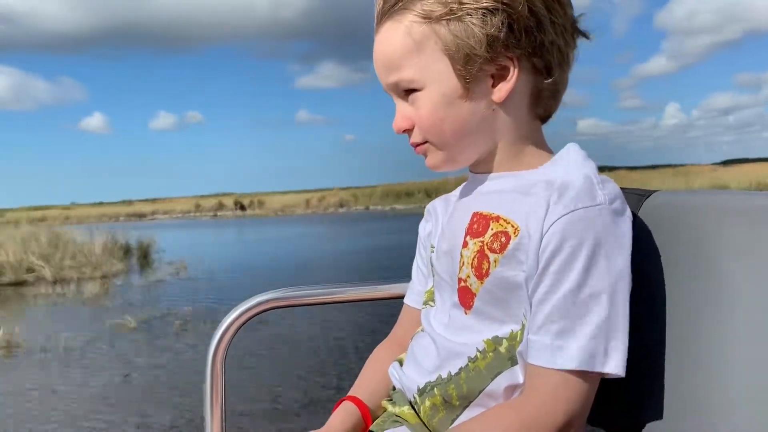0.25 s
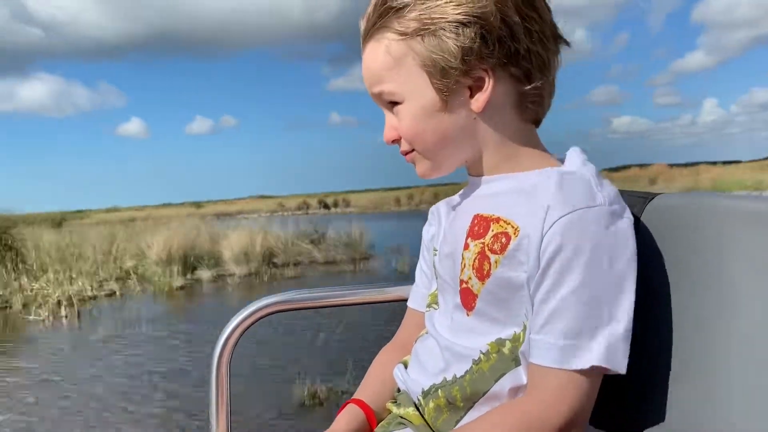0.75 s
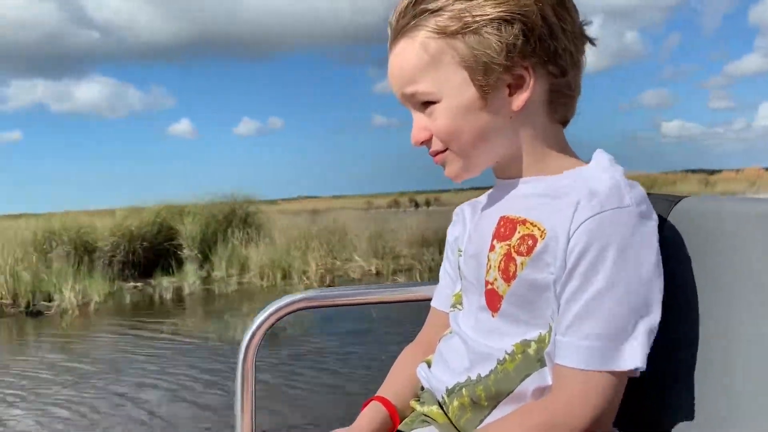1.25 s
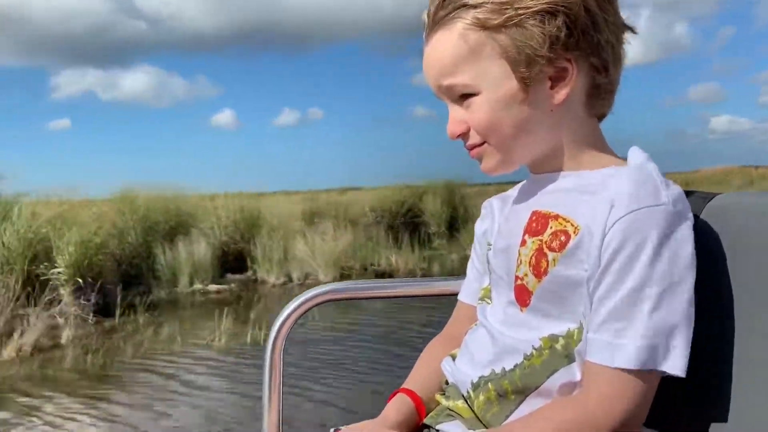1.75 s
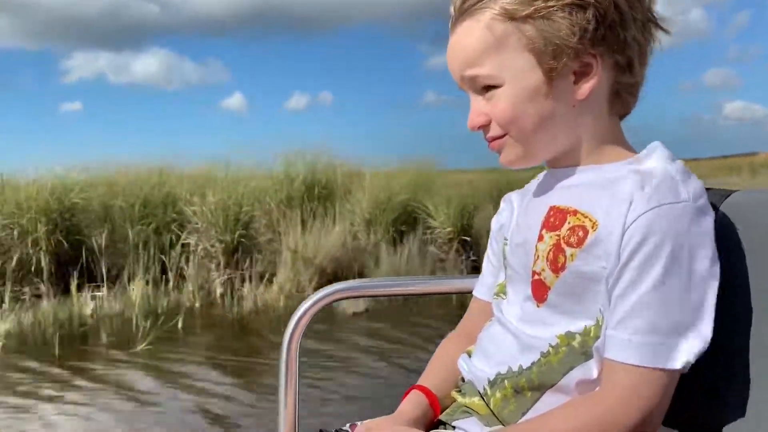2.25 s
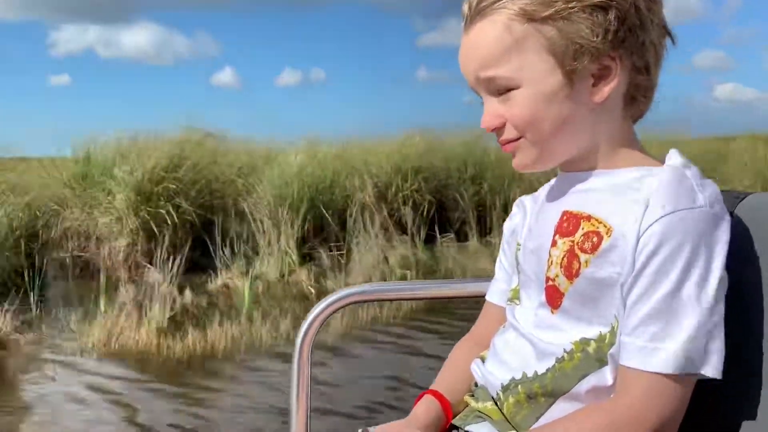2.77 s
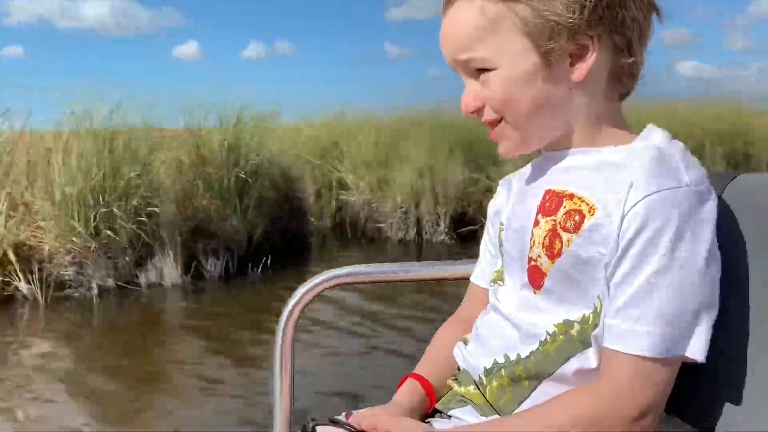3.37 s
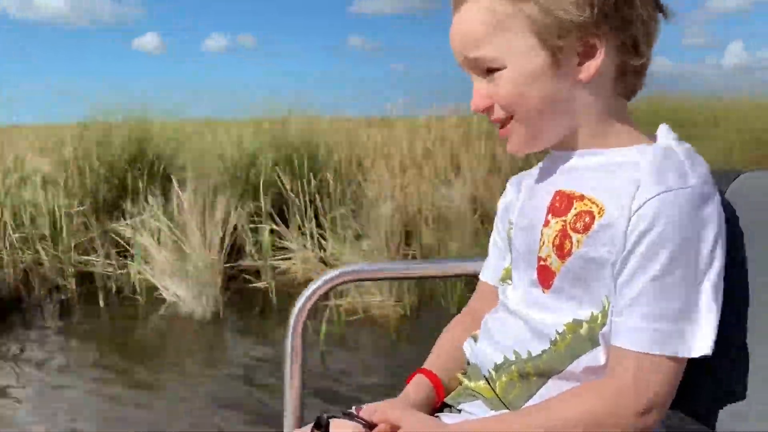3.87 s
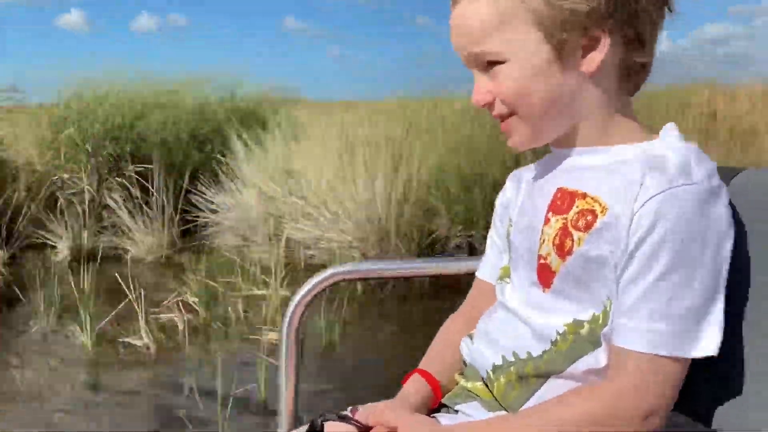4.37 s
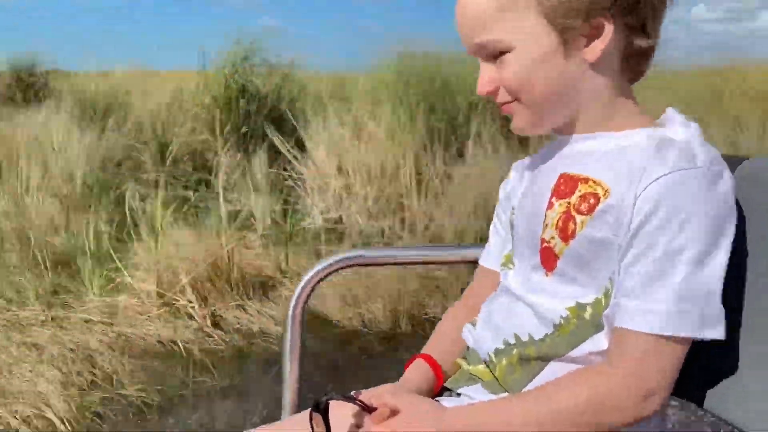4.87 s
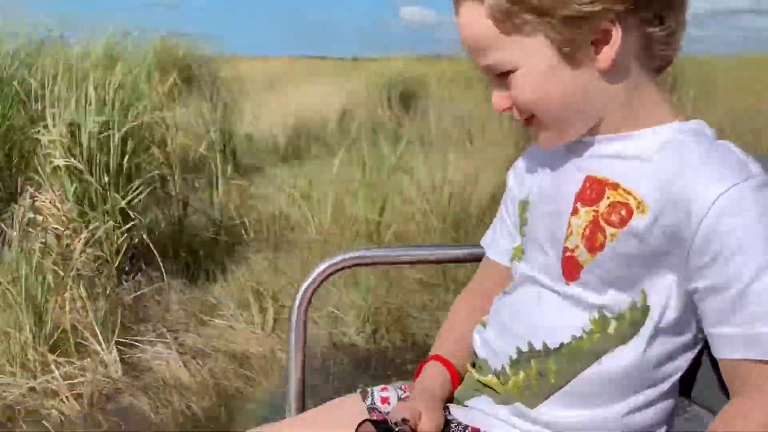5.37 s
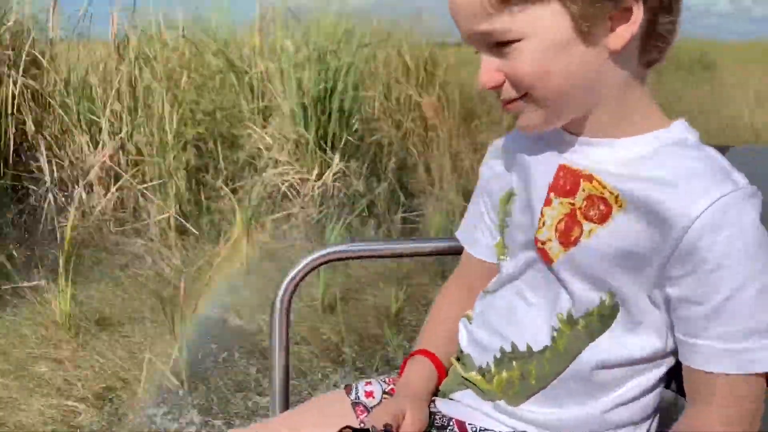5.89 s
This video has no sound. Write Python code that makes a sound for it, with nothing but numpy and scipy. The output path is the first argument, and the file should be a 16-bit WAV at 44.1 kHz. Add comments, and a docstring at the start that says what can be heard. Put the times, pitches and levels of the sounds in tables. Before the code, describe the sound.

Constant low propeller drone with fluttering buzz and exhaust throb fills an open marsh, air roar and hiss swelling slightly as the boat enters grass.

```python
"""Open marsh, on board a cruising airboat: the microphone is at a seat in front of the engine cage.
Closest is the three-blade propeller, whose clean drone and fluttering buzz are sums of blade-rate partials.
They beat against the exhaust partials of the geared V8 that turns it; a thin gear whine lies above.
Shaped noise makes the air rushing through the blades, the spray and the wind; its hiss swells in the grass.
Twice the microphone shifts in the hull's reflections, which recolours the buzz and exhaust."""
import sys
import numpy as np
from scipy import signal
from scipy.fft import rfft, irfft, next_fast_len
from scipy.io import wavfile

SR = 44100
rng = np.random.default_rng(int(sys.argv[2]) if len(sys.argv) > 2 else 0)


def to_wav(s):
    """Save 16-bit WAV."""
    ch = np.atleast_2d(s).T  # columns
    pcm = np.round(np.clip(ch, -1, 1) * 32767)  # PCM
    wavfile.write(sys.argv[1], SR, pcm.astype(np.int16))


N = 270333  # length [samples]

# Steady blade load at the two ports:
# (multiple of the blade rate, left lead [rad], left level [dB], right level [dB])
DRONE_PARTIALS = [(1, -.26, -21.6, -20.2), (2, -.09, -21.9, -22.3)]


def drone(blade):
    """The steady load on the blades: a rounded sawtooth of two clean partials, fluttering slightly."""
    out = np.zeros((2, N))
    for multiple, lead, *ears_db in DRONE_PARTIALS:
        arriving = multiple * blade + np.array([[lead], [0]]) / (2 * np.pi)
        flutter = from_db(0.5 * drift(13.0))
        out -= from_db(ears_db)[:, None] * tone(arriving) * flutter
    return out


# Propeller buzz at the microphone's three places, before BUZZ_DB:
# (multiple of the blade rate, left lead [rad], then left level [dB], right level [dB] for each place)
BUZZ_PARTIALS = [(3, -0.2, -44.5, -41.3, -44, -45.5, -44, -46),
                 (4, -1.5, -46.5, -42.2, -46, -42.5, -47.5, -43.5),
                 (5, 2.1, -43.7, -42.2, -40, -45.5, -42.5, -45),
                 (6, -2.3, -42, -46.5, -48, -51.5, -42, -50),
                 (7, 2.1, -53.5, -54, -49.5, -52, -44.5, -47.5),
                 (8, -1.4, -47, -45.7, -48.5, -48.5, -45.5, -50),
                 (9, -1.1, -47.5, -48.5, -52.5, -49.5, -47.5, -50),
                 (10, -1.8, -53.5, -51, -51, -48.5, -49, -50.5),
                 (11, -0.7, -49.5, -52, -54.5, -51, -52, -53.5),
                 (12, -2.2, -54.5, -52.5, -60.5, -53, -57.5, -53),
                 (13, -2.1, -52, -50.5, -54, -53, -59, -57.5), (14, 2.5, -52, -55, -55, -60, -54.5, -58),
                 (15, 3.0, -55.5, -56.5, -57.5, -59, -54.5, -54.5),
                 (16, 2.5, -63, -59.5, -57, -58, -55, -54.5), (17, 2.1, -56, -57, -57.5, -57.5, -56, -57.5),
                 (18, 2.5, -62, -62, -64, -64, -59, -59), (19, -3.1, -63, -60.5, -61.5, -59.5, -63, -62.5),
                 (20, -2.4, -61.5, -60.5, -60.5, -61, -62, -61.5),
                 (22, 3.1, -62, -62.5, -60.5, -62, -69.5, -69), (23, 3.0, -66, -66, -66, -66, -62, -62)]
BUZZ_DB = -0.73


def blade_buzz(blade, place, surging_db):
    """Blades chop eddies: upper partials flutter, the more the higher they lie; single ones flare at listed times."""
    steady_share, loss_per_order = .92, .055
    swell_db, swell_hz = 0.6, 8
    width_hz, widen_hz = 4.7, 0.4  # flutter rate: base, and what each order adds
    # moving air bends the travel time of all partials at once
    bent = blade + .009 * drift(8)
    out = np.zeros((2, N))
    for row in BUZZ_PARTIALS:
        multiple = row[0]
        gain = from_db(BUZZ_DB + surging_db + swell_db * drift(swell_hz))
        steady = steady_share - loss_per_order * multiple
        flutter_hz = width_hz + widen_hz * multiple
        out += partial(row, bent + rng.random(), place, steady, flutter_hz, gain, flares(multiple))
    return out


# Eddies that the blades chop, each making one partial flare; the shortest are single slaps:
# (time [s], multiple of the blade rate, level before FLARE_DB [dB], peak to a third [s])
EDDY_FLARES = [(0.313, 11, -41, .007), (0.366, 11, -43, .012), (0.47, 3, -37, .025), (0.604, 11, -41, .011),
               (0.659, 19, -46, .008), (0.755, 15, -43, .007), (0.83, 3, -30.5, .028),
               (0.981, 11, -38, .007), (1.395, 8, -41, .015), (1.41, 3, -32, .025), (1.432, 19, -45, .009),
               (1.59, 3, -35, .025), (1.652, 19, -45, .008), (2.165, 11, -39.5, .016), (2.36, 3, -34, .025),
               (2.823, 12, -42, .008), (2.89, 14, -48, .02), (3.00, 8, -44, .025), (3.08, 5, -41, .025),
               (3.313, 17, -44, .007), (3.55, 5, -36, .025), (3.632, 10, -40, .007), (3.75, 10, -45, .02),
               (3.95, 5, -41, .025), (4.27, 5, -41, .025), (4.52, 4, -39, .025), (4.82, 6, -43, .025),
               (5.01, 6, -41, .025), (5.06, 9, -42, .02), (5.251, 15, -44, .018), (5.538, 10, -41, .012),
               (5.613, 11, -36.5, .008), (5.648, 16, -42, .013), (5.692, 12, -42, .007),
               (5.745, 8, -43, .015), (5.799, 8, -41, .024), (5.80, 4, -38, .025), (5.84, 11, -39, .02),
               (5.96, 7, -35.5, .011), (5.972, 9, -39, .012), (5.97, 3, -34, .025), (6.049, 10, -39, .01),
               (6.076, 11, -39, .022), (6.11, 3, -33, .025)]
FLARE_DB = 0.5  # added to every flare


def flares(multiple):
    """Strength of one partial's flares: each swells and dies as its eddy crosses the disc."""
    return sum(from_db(db + FLARE_DB) * bump(s, width_s)
               for s, order, db, width_s in EDDY_FLARES if order == multiple)


# Exhaust at the microphone's three places:
# (multiple of the four-stroke cycle rate, left lead [rad], then left level [dB], right level [dB] for each place)
EXHAUST_PARTIALS = [(2, -0.3, -39.0, -38.5, -38.5, -38.0, -38.0, -38.0),
                    (3, -0.4, -36.5, -36.0, -36.0, -35.5, -44.0, -44.5),
                    (4, -0.1, -58.0, -58.0, -52.0, -56.5, -51.0, -54.0),
                    (5, -0.3, -34.5, -35.5, -35.0, -35.5, -37.5, -38.0),
                    (6, -0.3, -55.5, -55.5, -47.0, -48.5, -50.0, -55.5),
                    (7, -0.2, -50.5, -56.5, -42.5, -46.0, -43.0, -47.0),
                    (8, -0.7, -44.5, -48.5, -46.5, -59.5, -51.5, -53.0),
                    (9, -1.8, -50.5, -50.0, -55.5, -50.5, -56.5, -48.5),
                    (10, -2.9, -46.5, -43.0, -46.0, -44.0, -44.5, -56.5),
                    (11, -1.1, -47.0, -51.0, -52.0, -56.0, -48.5, -53.0),
                    (15, -0.2, -58.5, -54.5, -55.5, -59.0, -54.0, -57.0),
                    (16, 0.1, -52.0, -53.5, -54.0, -59.0, -53.0, -59.5),
                    (19, -0.7, -61.0, -58.5, -60.5, -56.5, -57.5, -55.0),
                    (28, -0.6, -61.0, -62.0, -63.5, -63.5, -63.0, -60.5),
                    (30, -1.7, -65.0, -63.0, -59.5, -59.0, -63.0, -62.0)]


def exhaust(cycle, place):
    """Eight firings a cycle, unevenly split between two pipes, sound many cycle multiples; the upper ones throb."""
    ragged_order, width_hz = 16, 6  # uneven combustion leaves no steady tone from this multiple up
    return sum(partial(row, cycle, place, 1 - (row[0] / ragged_order) ** 2, width_hz)
               for row in EXHAUST_PARTIALS)


# Gear whine: (time [s], level before WHINE_DB [dB])
WHINE_LEVEL = [(0.25, -69), (0.8, -64), (1.3, -68), (2.2, -63), (2.7, -58), (3.0, -61), (3.25, -56),
               (3.8, -59), (4.05, -69), (4.35, -59), (5.0, -57.5), (5.95, -59), (6.12, -53)]
WHINE_DB = -3


def gear_whine(cycle):
    """Teeth of the reduction drive mesh in a thin whine, broken up by the moving air on its way to each port."""
    meshes_per_cycle = 96
    flutter_db, flutter_hz = 2.6, 11
    bend_turns, bend_hz = .11, 8
    whine_db, = in_time(WHINE_LEVEL)
    ears = []
    for _ in range(2):
        turns = meshes_per_cycle * cycle + rng.random() + bend_turns * drift(bend_hz)
        ears.append(tone(turns) * from_db(flutter_db * drift(flutter_hz)))
    return from_db(WHINE_DB + whine_db) * np.array(ears)


# Broad eddies that make the throaty roar surge: (time [s], rise [dB])
ROAR_SURGES = [(0.33, 3), (0.64, 2.5), (1.25, 2), (1.47, 3), (1.93, 1), (2.16, 2), (2.33, 2), (2.86, 7),
               (3.0, 2), (3.17, 2.5), (3.68, 4), (5.05, 3), (5.25, 4), (5.83, 1), (6.06, 0.5)]
# Upper roar, 1.2-2.3 kHz: (time [s], level before UPPER_DB and surges [dB])
UPPER_ROAR_LEVEL = [(0.0, 1), (0.3, -0.5), (0.9, 0.8), (1.4, 3.2), (1.8, 1.0), (2.22, 3.2), (2.55, -0.8),
                    (3.05, 0.8), (3.3, 2), (3.58, 0.5), (4.1, -0.6), (4.65, 1.5), (5.4, 0.8), (5.7, 1.5),
                    (6.1, 2.5)]
SURGE_S = 0.05  # from a surge's peak to a third of its height
UPPER_DB, UPPER_SURGE_SHARE = -0.9, 0.46  # the share of each surge that reaches the upper roar


def prop_wash(blade, roar_db, surging_db):
    """The roar of the air stream swells unevenly with every blade, its low and high parts at different moments."""
    low_turn, high_turn = 0.2, 0.46  # where in a blade pass each part peaks [turns]
    low_depth, high_depth, uneven_db = .13, .33, 3
    eddy_db, eddy_hz = 1.0, 16
    edges_hz = [230, 400, 620, 1200, 1650, 2300]
    upper_db, = in_time(UPPER_ROAR_LEVEL)
    # eddies of each size come and go on their own
    eddies = [rush(low_hz, high_hz) * from_db(eddy_db * drift(eddy_hz))
              for low_hz, high_hz in zip(edges_hz, edges_hz[1:])]
    # a rasping resonance follows the surging air twice and flares twice as strongly
    rasp = rush(950, 1090) * from_db(surging_db + 2 * eddy_db * drift(eddy_hz))
    swell_db = sum(db * bump(s, SURGE_S) for s, db in ROAR_SURGES)
    low = (eddies[0] + eddies[1]) * from_db(roar_db)
    throat = (eddies[2] + rasp) * from_db(surging_db + swell_db)
    upper = (eddies[3] + eddies[4]) * from_db(UPPER_DB + upper_db + UPPER_SURGE_SHARE * swell_db)
    out = low * strokes(blade, low_turn, low_depth, uneven_db)
    for part in (throat, upper):
        out += part * strokes(blade, high_turn, high_depth, uneven_db)
    return out


# Hiss of water and grass along the hull: (time [s], level [dB])
GRASS_HISS = [(0.3, -0.9), (1.7, -0.5), (5.0, -0.6), (5.7, 0.5), (5.85, 1.5)]


def spray(blade, spray_db):
    """Patchy rasp of the air stream under the bright hiss of water and grass along the hull."""
    grass_db, = in_time(GRASS_HISS)
    pulse = 1 + .04 * np.cos(2 * np.pi * (blade - .5))
    patter = from_db(.45 * drift(60))
    rasp = rush(2300, 2900) * from_db(1.5 * drift(11)) + rush(2900, 5000)
    hiss = rush(5000, 17000) * from_db(grass_db)
    return (rasp * from_db(spray_db) + hiss) * pulse * patter


def wind(gust_db):
    """Gusts rumble on the microphone's ports, under the dull turbulence round the boat."""
    return rush(20, 72) * from_db(gust_db) + rush(52, 240) * from_db(-1.0 * drift(8.3))


# Rushing air and spray, before each layer's own gain: (frequency [Hz], density [dB per Hz])
RUSH_SPECTRUM = [(20, -69.5), (35, -61.8), (60, -58), (130, -59.6), (220, -58.9), (330, -67), (420, -71.6),
                 (520, -71), (690, -74.2), (780, -72), (880, -75), (1000, -70.8), (1160, -76.5),
                 (1400, -76.2), (1700, -78), (1900, -77.2), (2150, -78.6), (2400, -81), (2700, -81.8),
                 (5000, -89.6), (6300, -89.2), (14000, -93.4)]
# How alike the rush is in both ears: (frequency [Hz], likeness [0-1])
EAR_LIKENESS = [(60, .88), (210, .85), (300, .25), (700, .15), (1800, .4), (4000, .18), (7000, .5),
                (9000, .76), (14000, .84)]
# How much louder the rush is on the left: (frequency [Hz], difference [dB])
LEFT_EXCESS = [(100, 0), (1000, 0), (2200, 1.6), (4000, 1.2), (8000, -.7), (13000, 0)]
LEFT_LAG_S = 0.0002202  # the boat's noise reaches the right port first


def rush(low_hz, high_hz):
    """One band of rushing air in stereo: a shared part that reaches the left late, and a diffuse part."""
    size = next_fast_len(N)
    hz = np.arange(size // 2 + 1) * SR / size
    shared, *diffuse = rfft(rng.standard_normal((3, size)))
    direct = np.array([shared * np.exp(-2j * np.pi * hz * LEFT_LAG_S), shared])
    alike = np.clip(at_hz(EAR_LIKENESS, hz), 0, 1)
    field = np.sqrt(alike) * direct + np.sqrt(1 - alike) * np.array(diffuse)
    # half the difference is added on the left and taken from the right
    field = field * from_db(at_hz(LEFT_EXCESS, hz) / 2 * [[1], [-1]])
    below_high = 1 / (1 + (hz / high_hz) ** 8)
    below_low = 1 / (1 + (hz / low_hz) ** 8)
    band = np.sqrt(np.abs(below_high - below_low))
    spectrum = field * band * from_db(at_hz(RUSH_SPECTRUM, hz))
    return irfft(spectrum, size)[:, :N] * np.sqrt(SR / 2)


def partial(row, turns, place, steady, width_hz, gain=1, flare=0):
    """One order at both ports, steady tone plus flutter; direct sound and reflections add anew at each place."""
    multiple, lead, *levels_db = row
    steady = np.clip(steady, 0, 1)
    shared = .3  # share of the flutter that is common to both ports
    common = np.sqrt(shared) * np.array([drift(width_hz), drift(width_hz)])
    # a flare slides in pitch as its eddy moves: .11 rad per order
    slide = .11 * multiple * drift(22)
    ears = []
    for ear_lead, places_db in zip((lead, 0), np.reshape(levels_db, (-1, 2)).T):
        level = gain * np.interp(place, range(len(places_db)), from_db(places_db))
        angle = (2 * np.pi * (multiple * turns % 1) + ear_lead).astype(np.float32)
        own = np.sqrt(1 - shared) * np.array([drift(width_hz), drift(width_hz)])
        along, across = np.sqrt(1 - steady) * (common + own)
        held = level * ((np.sqrt(2 * steady) + along) * np.sin(angle) + across * np.cos(angle))
        ears.append(held + np.sqrt(2) * flare * np.sin(angle + slide))
    return np.array(ears)


def strokes(blade, peak_turn, depth, uneven_db):
    """A swell for every blade pass, each with a strength of its own; rms 1."""
    turns = blade - peak_turn + 1.5
    strengths = from_db(uneven_db * np.clip(rng.standard_normal(N // 100), -2, 2))
    strength = strengths[turns.astype(int)]
    swell = 1 - depth + 2 * depth * strength * np.sin(np.pi * turns) ** 2
    return swell / np.sqrt(np.mean(swell ** 2))


def bump(s, width_s):
    """A smooth swell of height 1 around a moment."""
    return np.exp(-np.minimum(((np.arange(N) / SR - s) / width_s) ** 2, 20))


def tone(turns):
    """A clean sine of rms 1."""
    return np.sqrt(2) * np.sin(2 * np.pi * turns)


def drift(rate_hz):
    """Smooth chance with spread 1 that changes about rate_hz times a second."""
    step, run_in = 40, 2000  # [samples] between slow values; [slow values] thrown away
    r = np.exp(-2 * np.pi * step * rate_hz / SR)
    noise = rng.standard_normal(N // step + run_in + 2)
    slow = signal.lfilter([1], [1, -2 * r, r * r], noise)[run_in:]
    slow = slow / slow.std()
    fraction = np.arange(step) / step
    return (slow[:-1, None] + np.diff(slow)[:, None] * fraction).ravel()[:N]


def from_db(db):
    """Decibels to gain."""
    return 10 ** (np.asarray(db) / 20)


def in_time(rows):
    """Each column of a curve at every sample."""
    s, *columns = np.transpose(rows)
    return [np.interp(np.arange(N) / SR, s, c) for c in columns]


def at_hz(points, hz):
    """A spectrum read on a log-frequency axis."""
    knots, values = np.transpose(points)
    return np.interp(np.log(hz + 1e-3), np.log(knots), values)


# Propeller speed: (time [s], blade passes per second [Hz])
BLADE_RATE = [(0.0, 92.18), (0.5, 92.52), (1.0, 92.67), (1.5, 93.02), (2.0, 92.97), (2.5, 92.86),
              (3.0, 92.75), (3.5, 92.46), (4.0, 92.31), (4.5, 91.84), (5.0, 91.81), (5.5, 91.29),
              (6.13, 90.26)]
# The microphone's place among the hull's reflections: (time [s], place [0, 1 or 2])
MICROPHONE_PLACE = [(2.3, 0), (3.2, 1), (4.35, 1), (4.9, 2)]
# Turbulence of the propeller's air: rises as the bank nears, eases along it, grows as the boat runs into grass.
# Only its distance from the mean is used: (time [s], level [dB])
INFLOW_TURBULENCE = [(0.05, -36), (1.28, -34.5), (3.81, -35.5), (6.1, -33)]
BLADE_COUNT, GEAR_RATIO = 3, 55 / 24
BLADE_START, ENGINE_START = .785, .615  # where each stands in its cycle at first [turns]
ROAR_DB, WASH_DB, SPRAY_DB, GUST_DB = 3.5, 0.9, 0.75, -1.5  # gains at mean turbulence
# what each gains per dB of turbulence [dB]; rough inflow takes from the clean drone
ROAR_FOLLOWS, WASH_FOLLOWS, SPRAY_FOLLOWS, GUST_FOLLOWS, DRONE_FOLLOWS = 3.1, 0.51, 0.46, 1.7, -0.7
ROAR_SHELTER_DB = 1  # the low roar is this much weaker once the microphone has left its first place
SURGE_DB, SURGE_HZ = 0.52, 12  # big eddies pass through the whole disc


def scene():
    """One shaft speed drives propeller and engine; turbulence lifts buzz, roar, spray, gusts and weakens the drone."""
    blade_hz, = in_time(BLADE_RATE)
    place, = in_time(MICROPHONE_PLACE)
    turbulence_db, = in_time(INFLOW_TURBULENCE)
    turbulence_db = turbulence_db - turbulence_db.mean()

    surging_db = WASH_DB + WASH_FOLLOWS * turbulence_db + SURGE_DB * drift(SURGE_HZ)
    roar_db = ROAR_DB + ROAR_FOLLOWS * turbulence_db - ROAR_SHELTER_DB * np.minimum(place, 1)
    spray_db = SPRAY_DB + SPRAY_FOLLOWS * turbulence_db
    gust_db = GUST_DB + GUST_FOLLOWS * turbulence_db

    passes = np.cumsum(blade_hz) / SR
    blade = passes + BLADE_START
    cycle = passes / BLADE_COUNT * GEAR_RATIO / 2 + ENGINE_START  # two crank turns to a cycle

    propeller = from_db(DRONE_FOLLOWS * turbulence_db) * drone(blade) + blade_buzz(blade, place, surging_db)
    engine = exhaust(cycle, place) + gear_whine(cycle)
    air = prop_wash(blade, roar_db, surging_db) + wind(gust_db)
    return propeller + engine + air + spray(blade, spray_db)


CUTOFF_HZ = 15200


def record(dry):
    """The microphone drops the infrasound; the top is cut steeply."""
    dry = signal.sosfilt(signal.butter(2, 13, "high", fs=SR, output="sos"), dry)
    return signal.sosfiltfilt(signal.ellip(10, .05, 60, CUTOFF_HZ, fs=SR, output="sos"), dry)


dry = scene()
out = record(dry)
to_wav(out)
```